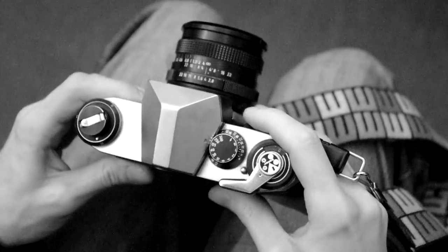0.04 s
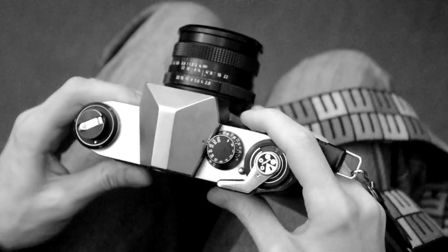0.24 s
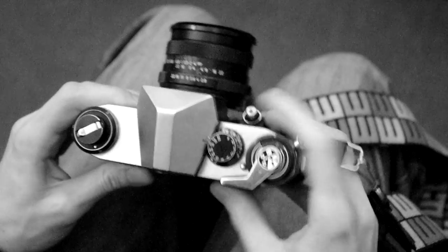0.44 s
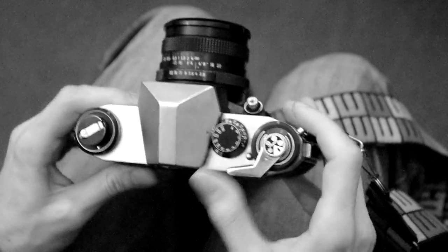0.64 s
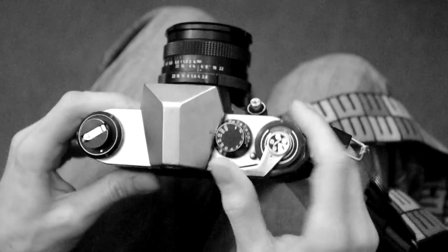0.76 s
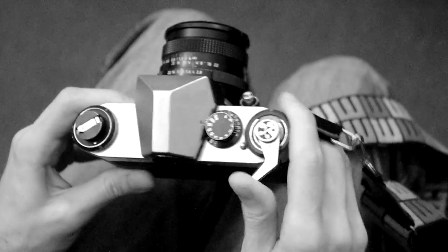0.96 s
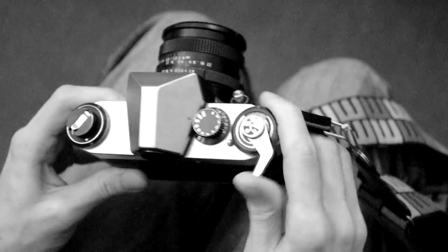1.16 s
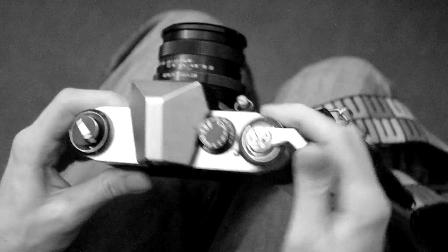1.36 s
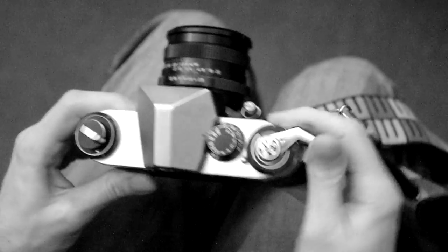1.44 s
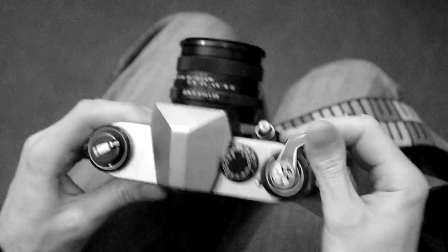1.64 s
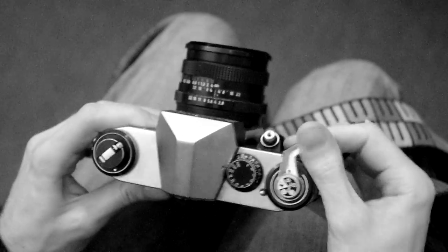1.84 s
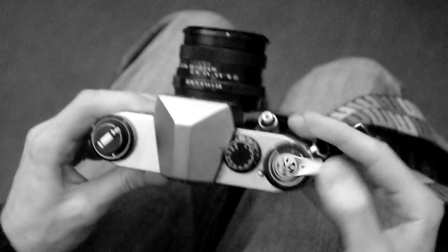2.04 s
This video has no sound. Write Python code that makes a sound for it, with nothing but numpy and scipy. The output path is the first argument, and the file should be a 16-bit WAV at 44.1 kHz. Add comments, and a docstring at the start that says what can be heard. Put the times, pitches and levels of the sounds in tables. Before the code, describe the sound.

Sharp shutter snap of a mechanical camera, followed by ratcheting as the film is wound.

```python
"""Mechanical film camera: release and winding

Close by in a quiet room, the button clicks and mirror and curtains clack, each impact exciting many
short-lived modes. Gears whirr, springs ring on in free vibration and a small steel part jingles.
A thumb cranks the advance lever: a pawl ticks over its ratchet, the film drags with friction,
and the lever meets its stop and starts back."""
import sys
import numpy as np
from scipy import signal
from scipy.fft import rfft, irfft
from scipy.io import wavfile
from scipy.ndimage import uniform_filter1d

SR = 44100
rng = np.random.default_rng(int(sys.argv[2]) if len(sys.argv) > 2 else 0)


def unload_audio(sound):
    """Save the sound as a 16-bit wav file, at the path given as the first command line argument."""
    columns = np.transpose(np.atleast_2d(sound))
    # keep every value between -1 and 1, then stretch to whole-number steps
    steps = np.round(np.clip(columns, -1, 1) * 32767)
    wavfile.write(sys.argv[1], SR, steps.astype(np.int16))


N = 92610
TIME = np.arange(N) / SR
BAND_EDGES_HZ = (800, 3000, 8000, 16000)  # bound the low, middle and high bands of a click
REFERENCE_S = 0.004  # a transient's level is that of a steady sound this long with equal energy

# Impacts of the button, the shutter works and the lever. Each row: start in seconds, decay in ms,
# low, middle and high band levels in dB, then one or two resonances of the struck part in Hz.
BUTTON_CLICKS = [(.0260, 4.5, -62, -41, -50, 7250), (.0306, 0.97, -48.5, -53, -46, 2400),
                 (.1355, 1.1, -38, -37.5, -41.5, 2670), (.1764, 1.1, -45, -42.5, -50.5, 4180)]
SHUTTER_BLOWS = [(0.2190, 1.3, -31, -22, -21, 8400, 3660), (0.2321, 1.5, -31.5, -27, -30, 8600, 3780),
                 (.2400, 1.1, -29.5, -23, -24.5, 6900, 1330), (.2715, 0.88, -23, -17.5, -18.5, 4800, 2520),
                 (0.2950, 0.86, -32, -26, -25.5, 6600, 2250), (0.2992, 1.5, -29, -22, -22.5, 7600, 2300),
                 (0.3310, 1.4, -28, -30.5, -30, 8500, 1650), (.3602, 3.3, -39, -39.5, -39, 5800, 2250),
                 (.4905, 9.1, -40, -35, -43, 6460, 4350), (.5058, 0.85, -31, -23.5, -30.5, 6600, 1760)]
LEVER_KNOCKS = [(.9823, 0.56, -45, -51, -48, 10500), (.9960, 1.4, -40, -37.5, -41, 8200),
                (1.1952, 1.1, -44.5, -44.5, -48.5, 4200), (1.4140, 0.79, -41.5, -32, -44, 8100),
                (1.4535, 0.65, -42, -34, -45, 7240), (1.5877, 1.5, -41.5, -36, -47, 4900),
                (1.726, 1.8, -39, -42.5, -48, 5560), (1.7935, 0.72, -33, -26, -25, 10750),
                (1.8056, 0.88, -30.5, -23, -32, 7300), (1.9976, 0.73, -33.5, -36, -37.5, 4780),
                (2.0400, 1.6, -38.5, -38.5, -45, 4900), (2.0460, 9.2, -41, -36, -44.5, 6800)]
# Envelopes of the running curtains and the dragging film. Each row: time in seconds, level in dB.
WHIRR_LEVELS = [(.221, -38), (.226, -26), (.246, -39), (.270, -19.5), (.279, -38), (.292, -34), (.310, -44),
                (.338, -34.5), (.366, -27), (.385, -33.5), (.42, -43)]
DRAG_LEVELS = [(1.24, -57), (1.30, -50), (1.34, -45), (1.40, -53), (1.71, -48), (1.79, -62)]
# Body resonances under heavy blows. Each row: start in seconds, level in dB, centre in Hz,
# bandwidth in Hz, decay of the excitation in seconds.
BODY_THUMPS = [(0.2711, -31.5, 435, 490, 0.0022), (1.4135, -38.5, 550, 224, 0.0057),
               (1.4135, -32.5, 920, 400, 0.055), (1.4540, -39, 1630, 260, 0.007),
               (1.5900, -43, 570, 150, 0.004), (1.8080, -34.5, 970, 340, 0.054),
               (1.8057, -29.5, 2040, 600, 0.0098), (1.8057, -39, 13750, 500, 0.014)]
# Modes of the springs. Each row: frequency in Hz, relative level in dB, time to fall 60 dB in seconds.
SPRING_MODES = [(1273, -39.5, 1.35), (1433, -49, 0.6), (1751, -52, 1.74), (2300, -36, 0.4),
                (2460, -48, 0.3)]
# Jolts that excite the springs. Each row: start in seconds, gain in dB.
SPRING_JOLTS = [(0.36, -2), (1.8057, -8)]
# Mode clusters of the steel part. Each row: centre in Hz, bandwidth in Hz, level in dB, decay in seconds.
JINGLE_CLUSTERS = [(6410, 110, -39, 0.052), (8760, 400, -41, 0.028), (9350, 480, -45.5, 0.034)]
# Ticks of the pawl. Each row: start in seconds, high band level in dB, resonance in Hz.
PAWL_TICKS = [(1.2485, -35, 8900), (1.2867, -36.5, 10100), (1.3042, -36.5, 10300), (1.3182, -34, 7700),
              (1.3323, -37, 7400), (1.3663, -38, 9150), (1.3877, -39, 7920), (1.4121, -37, 7640),
              (1.4384, -37.5, 10800), (1.4604, -38, 4900), (1.4856, -37.5, 5840), (1.5115, -36.5, 4720),
              (1.5417, -35.5, 10600), (1.5688, -35, 10300), (1.5789, -39.5, 11500), (1.5890, -38, 6550),
              (1.6131, -39, 6900), (1.6350, -38, 9820), (1.6575, -39, 4770), (1.6766, -39, 4800),
              (1.6952, -37.5, 4980)]
# Ticks grow longer and fuller as the spring tightens. Each row: time in seconds, decay in ms,
# low and middle band levels in dB relative to the high band.
PAWL_TENSION = [(1.25, 0.64, -14.5, -4.5), (1.70, 0.85, -9, -0.5)]
# Reverberation of the room. Each row: frequency in Hz, time to fall 60 dB in seconds.
ROOM_DECAY = [(2500, 0.45), (7000, 0.32), (15000, 0.28)]
# Spectral envelopes of the sounds and the room. Each row: frequency in Hz, relative level in dB.
AIR_SPECTRUM = [(40, -21), (200, 0.5), (500, 1.5), (2000, -5.5), (8000, -14.5), (15000, -29)]
METAL_SPECTRUM = [(40, -43), (150, -31.5), (700, -11.5), (2100, 1.5), (3300, -1.5), (9000, 5), (11000, 3),
                  (12500, -4.5), (16000, -20.5)]
WHIRR_SPECTRUM = [(200, -40), (700, -7), (1300, 1.5), (2400, 1.5), (7300, 4), (11000, -1), (16000, -25)]
SCRAPE_SPECTRUM = [(1000, -13), (4500, -9.5), (6400, 8), (7700, -3), (9200, 3), (12000, -23)]
DRAG_SPECTRUM = [(200, -9.5), (1200, -4.5), (1800, 5), (3000, -1), (5500, 0.5), (11000, -2.5), (16000, -30)]
TICK_SPECTRUM = [(100, -40), (2500, -8.5), (5000, 5.5), (11500, 5), (13200, -5.5), (16000, -19)]
ROOM_SPECTRUM = [(100, -11.5), (500, 2), (1200, 0.5), (8000, -3.5), (16000, -10)]


def amp(db):
    return 10 ** (np.asarray(db) / 20)


def unit_rms(x):
    return x / np.sqrt(np.mean(x ** 2))


def over_hz(points, hz):
    """Interpolation on a logarithmic frequency axis."""
    corners_hz, values = np.array(points).T
    return np.interp(np.log(hz + 1), np.log(corners_hz), values)


def bin_hz(size):
    return np.arange(size // 2 + 1) * SR / size


def minimum_phase(gain):
    """Folding the cepstrum gives a causal response with this magnitude."""
    cepstrum = irfft(np.log(gain + 1e-6))
    half = len(cepstrum) // 2
    cepstrum[1:half] *= 2
    cepstrum[half + 1:] = 0
    return np.exp(rfft(cepstrum))


def colour(x, spectrum):
    """Minimum-phase filtering imposes a spectral envelope."""
    size = 2 * len(x)
    gain = amp(over_hz(spectrum, bin_hz(size)))
    return irfft(rfft(x, size) * minimum_phase(gain))[:len(x)]


def resonate(x, hz, width_hz):
    """Band-pass resonance with steep skirts."""
    edges_hz = [max(hz - width_hz / 2, 30), hz + width_hz / 2]
    return signal.sosfilt(signal.butter(2, edges_hz, "band", fs=SR, output="sos"), x)


def add(out, at_s, x):
    """Superposition of x from a given time."""
    start = max(int(at_s * SR), 0)
    out[start:start + len(x)] += x[:N - start]


def at_level(x, db):
    """Energy normalisation sets a transient's level."""
    return x * amp(db) * np.sqrt(REFERENCE_S * SR / np.sum(x ** 2))


def air():
    """Steady broadband noise forms the room's faint background."""
    return amp(-53.5) * unit_rms(colour(rng.standard_normal(N), AIR_SPECTRUM))


def click(decay_ms, band_db, spectrum, rings_hz, ring_db, width_hz, case_db, rise_ms, snap=0, size=2048):
    """Impact excitation: dense, fast-dying modes, a weaker ring of the case and the part's resonances."""
    t, hz = TIME[:size], bin_hz(size)
    attack = 1 - np.exp(-t * 1e3 / rise_ms)
    decay = np.exp(-t * 1e3 / decay_ms) + amp(case_db) * np.exp(-t / 0.0068)
    burst = rfft(rng.standard_normal(size) * attack * decay + snap * signal.unit_impulse(size, 2))
    resonances_db = sum(ring_db / (1 + ((hz - centre) / width_hz) ** 2) for centre in rings_hz)
    burst_magnitude = np.sqrt(uniform_filter1d(abs(burst) ** 2, size=40))
    gain = amp(over_hz(spectrum, hz) + resonances_db) / burst_magnitude
    # Bring each band to its level, smoothing the steps between bands.
    power = abs(burst * gain) ** 2 * 2 / size / (REFERENCE_S * SR)
    trim_db = [db - 10 * np.log10(power[(hz > low) & (hz < high)].sum())
               for db, low, high in zip(band_db, BAND_EDGES_HZ, BAND_EDGES_HZ[1:])]
    tilt_db = uniform_filter1d(np.array(trim_db)[np.digitize(hz, BAND_EDGES_HZ[1:-1])], size=60)
    return irfft(burst * minimum_phase(gain * amp(tilt_db)))


def impacts(rows, ring_db=9):
    """Successive metal impacts add by superposition."""
    out = np.zeros(N)
    for at, decay_ms, low, middle, high, *rings_hz in rows:
        add(out, at, click(decay_ms, (low, middle, high), METAL_SPECTRUM, rings_hz, ring_db,
                           width_hz=240, case_db=-18.5, rise_ms=0.34))
    return out


def button():
    """Light impacts under the finger excite the release button's resonances."""
    return impacts(BUTTON_CLICKS, ring_db=15.5)


def friction(levels, spectrum, scatter_db, grain_samples=24):
    """Friction noise: dense tiny contacts of uneven size follow a level curve."""
    grain_db = scatter_db * rng.standard_normal(N // grain_samples + 1)
    contacts = amp(np.repeat(grain_db, grain_samples)[:N]) * rng.standard_normal(N)
    times, db = np.array(levels).T
    envelope = amp(np.interp(TIME, times, db, left=-120, right=-120))
    return unit_rms(colour(contacts, spectrum)) * envelope


def shutter():
    """Mirror and curtains strike in turn; running friction whirrs between the impacts."""
    return impacts(SHUTTER_BLOWS) + friction(WHIRR_LEVELS, WHIRR_SPECTRUM, scatter_db=3)


def body():
    """Heavy blows excite the damped resonances of the body."""
    out = np.zeros(N)
    for at, db, hz, width_hz, decay_s in BODY_THUMPS:
        excitation = rng.standard_normal(N) * np.exp(-TIME / decay_s)
        add(out, at, at_level(resonate(excitation, hz, width_hz), db))
    return out


def springs():
    """Free vibration: after each jolt the springs' modes decay exponentially."""
    out = np.zeros(N)
    ringing = sum(amp(db) * np.sin(2 * np.pi * hz * TIME) * np.exp(-np.log(1000) * TIME / t60)
                  for hz, db, t60 in SPRING_MODES)
    for at, db in SPRING_JOLTS:
        add(out, at, amp(db) * ringing)
    return out


def gears(peak_at_s=0.3766, span_s=0.021):
    """A narrow resonance sings briefly as the gear train runs down."""
    tone = unit_rms(resonate(rng.standard_normal(N), hz=2370, width_hz=170))
    swell = np.exp(-((TIME - peak_at_s) / span_s) ** 2)
    return amp(-32.5) * tone * swell


def jingle(at_s=0.863, contact_s=0.012):
    """A small steel part scrapes briefly, and its closely spaced modes beat as they decay."""
    out = np.zeros(N)
    contact = TIME / contact_s * np.exp(-(TIME / contact_s) ** 2)
    scrape = colour(rng.standard_normal(N) * contact, SCRAPE_SPECTRUM)
    add(out, at_s, at_level(scrape, db=-33.5))
    attack = 1 - np.exp(-TIME / contact_s)
    for hz, width_hz, db, decay_s in JINGLE_CLUSTERS:
        cluster = resonate(rng.standard_normal(2 * N), hz, width_hz)[N:]  # steady state only
        add(out, at_s, at_level(cluster * attack * np.exp(-TIME / decay_s), db))
    return out


def lever():
    """Impacts mark the lever's travel; film and gears drag with sliding friction during the stroke."""
    return impacts(LEVER_KNOCKS) + friction(DRAG_LEVELS, DRAG_SPECTRUM, scatter_db=4)


def ratchet():
    """An impact train: the pawl drops over tooth after tooth under rising spring tension."""
    out = np.zeros(N)
    times, *columns = np.array(PAWL_TENSION).T
    for at, db, hz in PAWL_TICKS:
        decay_ms, low, middle = (np.interp(at, times, column) for column in columns)
        tick = click(decay_ms, (low, middle, 0), TICK_SPECTRUM, [hz], ring_db=9,
                     width_hz=550, case_db=-16, rise_ms=0.071, snap=1.4)
        add(out, at, amp(db) * tick)
    return out


def reverberation(x, onset_s=0.0032, gain_db=-2, size=32768):
    """The room's diffuse field decays exponentially, sooner in the treble."""
    hz, t, noise = signal.stft(rng.standard_normal(size), SR, nperseg=256)
    t60 = over_hz(ROOM_DECAY, hz)[:, None]
    equal_energy = np.sqrt(2 * np.log(1000) / (t60 * SR))
    fading = np.exp(-np.log(1000) * t / t60) * equal_energy
    build_up = 1 - np.exp(-TIME[:size] / onset_s)
    tail = signal.istft(noise * fading, SR)[1][:size] * build_up
    return amp(gain_db) * signal.fftconvolve(x, colour(tail, ROOM_SPECTRUM))[:N]


def scene():
    """Direct sound, reverberation and background noise superpose in one channel."""
    release = button() + shutter()
    winding, ticks = lever(), ratchet()
    ringing = body() + springs() + gears() + jingle()
    into_room = release + amp(1) * winding + amp(-2) * ticks + amp(-9) * ringing
    return (release + winding + ticks + ringing + reverberation(into_room) + air())[None]


def record(dry, ceiling=0.31, low_cut_hz=90, top_hz=15300):
    """Soft saturation rounds the loudest peaks; band limiting thins the bass and cuts the top."""
    rounded = ceiling * np.tanh(dry / ceiling)
    thinned = signal.sosfilt(signal.butter(2, low_cut_hz, "high", fs=SR, output="sos"), rounded)
    return signal.sosfilt(signal.ellip(8, .2, 70, top_hz, fs=SR, output="sos"), thinned)


dry = scene()
out = record(dry)
unload_audio(out)
```